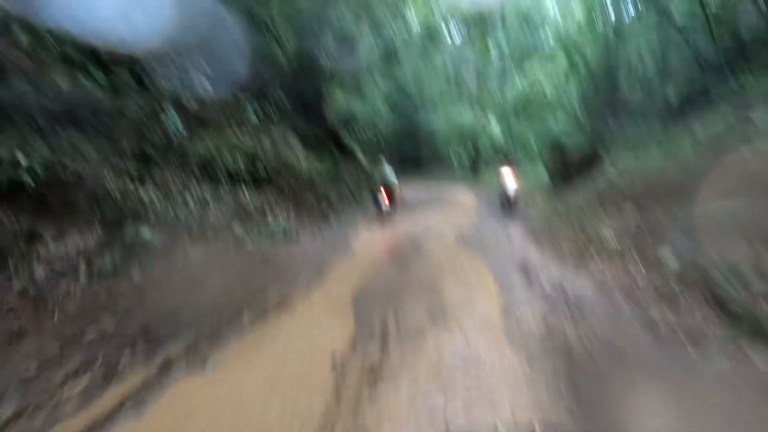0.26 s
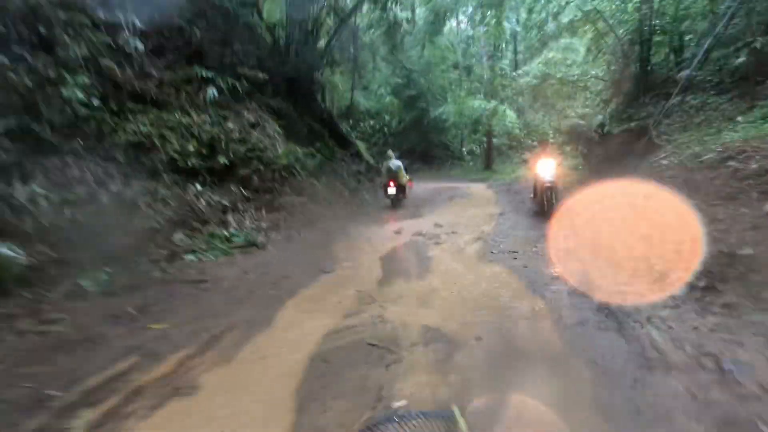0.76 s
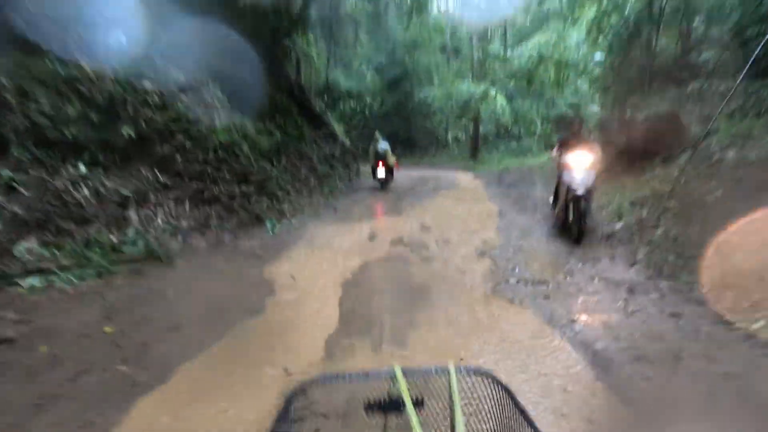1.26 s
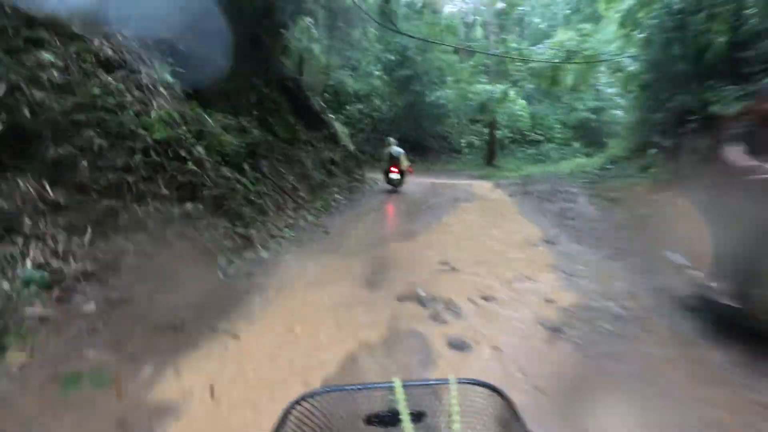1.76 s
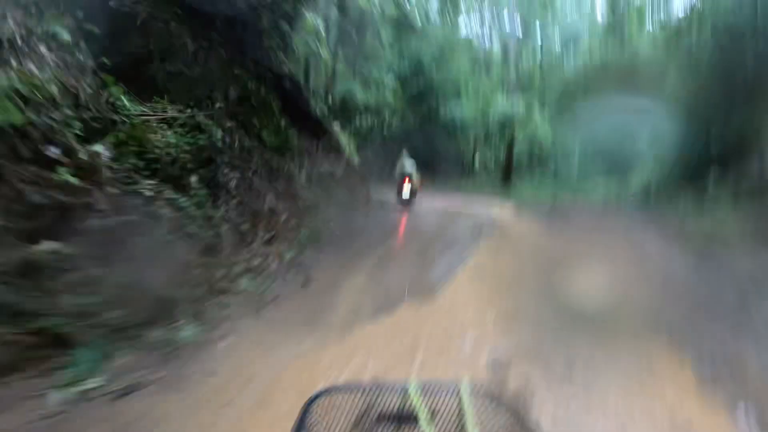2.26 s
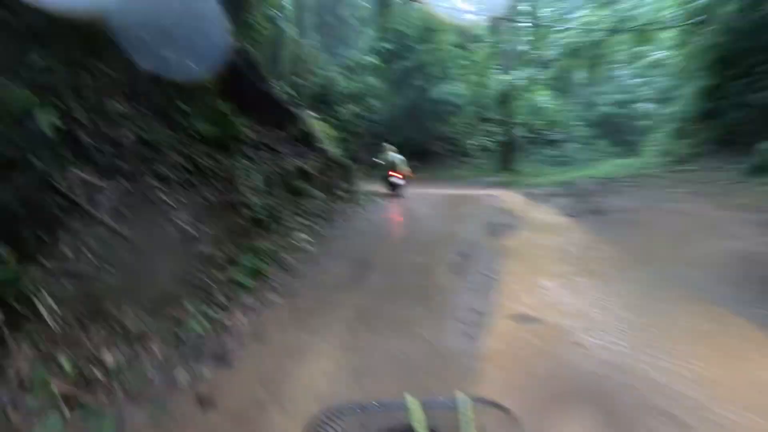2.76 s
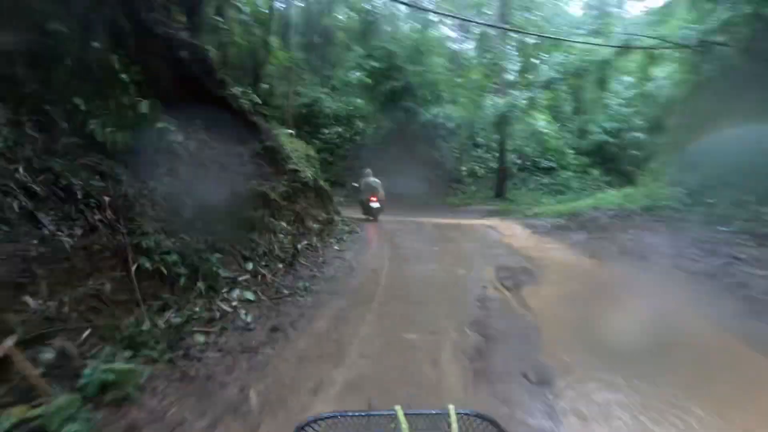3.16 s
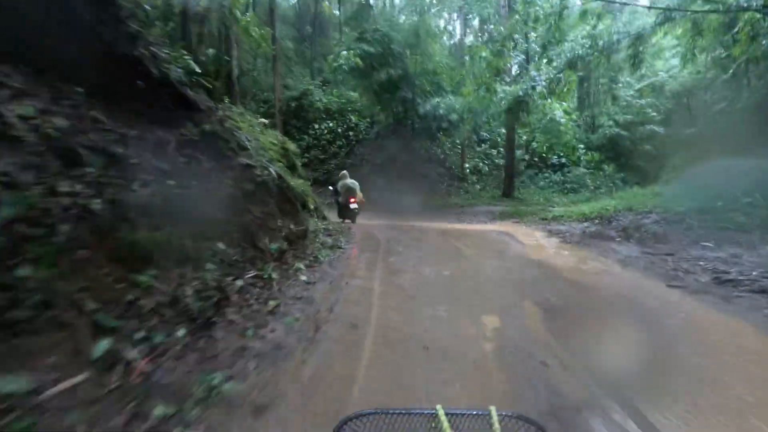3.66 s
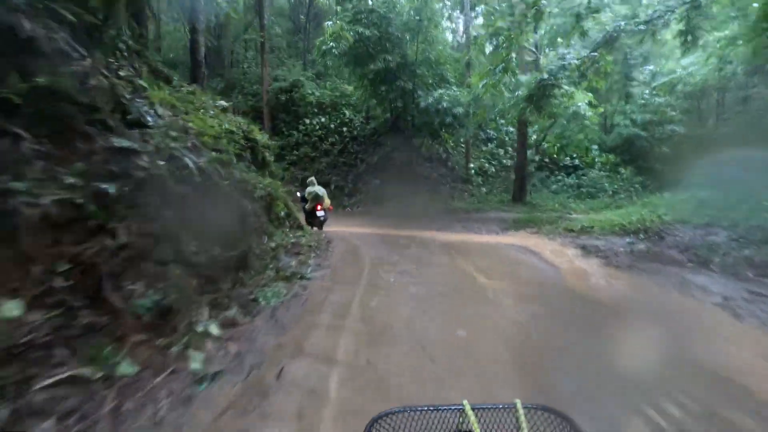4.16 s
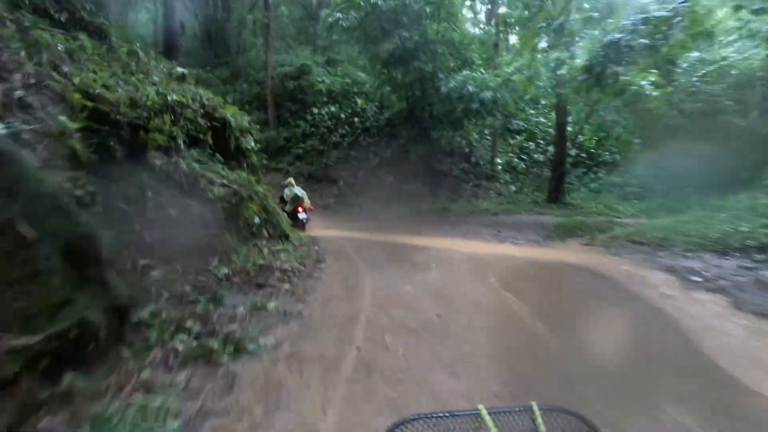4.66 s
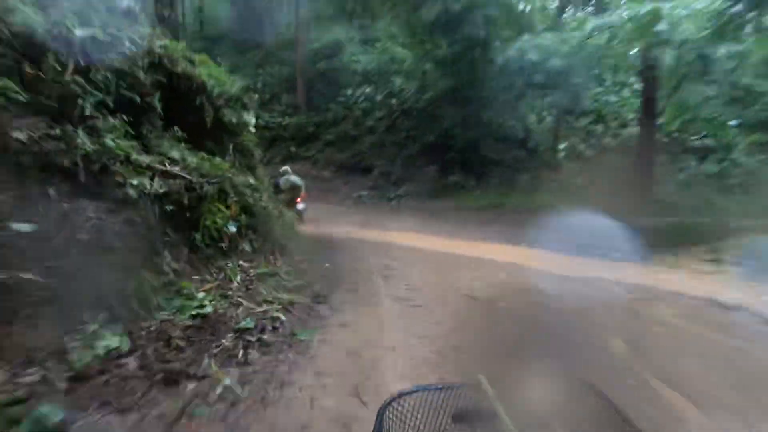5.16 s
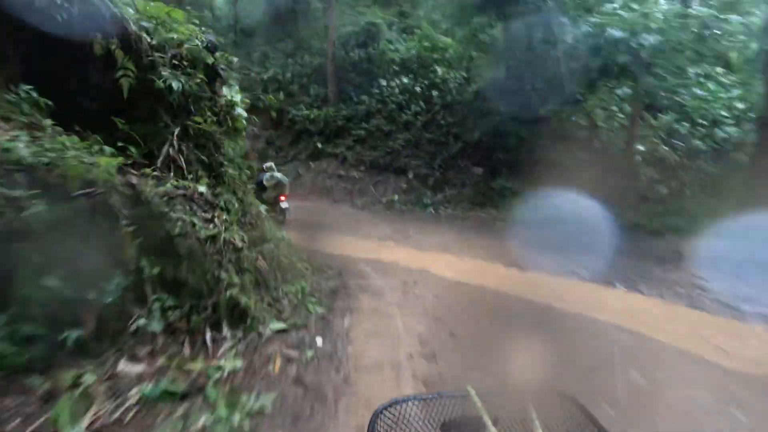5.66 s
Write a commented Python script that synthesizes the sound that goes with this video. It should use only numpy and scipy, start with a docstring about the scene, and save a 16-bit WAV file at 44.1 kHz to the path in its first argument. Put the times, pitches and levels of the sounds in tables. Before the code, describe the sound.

A small single-cylinder motorbike chugs at a nearly steady speed for about six seconds, heard from the rider. Low wind buffets the microphone throughout, over a dull churn of wheels in mud. A short wet swish comes at about 0.3 seconds. Loose parts and the basket knock several times between 0.9 and 1.9 seconds. An oncoming motorbike rushes past at about 1.6 seconds, its note dropping, then revs away with deep pops, loudest around 2.4 seconds. Water swishes over the microphone near 2.7 seconds, and the muffled sound gradually opens into a soft rain hiss. From 3 seconds, bumps bring small ringing rattles, and raindrops tap the microphone, growing sharper and louder from about 4 seconds. At 5.5 seconds one big drop slaps loudly on the right, briefly dipping everything else. A few more taps follow as the hiss dulls and the engine carries on.

```python
"""A small single-cylinder motorbike chugs along a muddy track in heavy rain, heard from a camera on the rider.
Gas pulses excite the exhaust's resonances, bumps ring loose parts and turbulence buffets the microphone.
An oncoming bike passes, popping. Drops tap the housing, and water on its port (the window) muffles the
rain until it drains and the hiss opens up. Near the end one big drop makes the limiter duck."""
import sys
import numpy as np
from scipy import signal
from scipy.fft import rfft, irfft, next_fast_len
from scipy.io import wavfile
from scipy.ndimage import uniform_filter1d, minimum_filter1d, map_coordinates

SR = 44100
rng = np.random.default_rng(int(sys.argv[2]) if len(sys.argv) > 2 else 0)


def output_pcm(signal):
    """Save a mono or channel-first signal as 16-bit PCM at the path in sys.argv[1].

    Samples are clipped to [-1, 1] before scaling.
    """
    pcm = np.clip(np.atleast_2d(signal).T, -1, 1) * 32767
    wavfile.write(sys.argv[1], SR, np.round(pcm).astype(np.int16))


N = 261041
T = np.arange(N) / SR


def amp(db):
    """Decibels to amplitude ratio."""
    return 10 ** (np.asarray(db) / 20)


def unit(x):
    """Normalisation to rms 1."""
    return x / np.sqrt(np.mean(x ** 2) + 1e-20)


def along(points, hz):
    """Interpolation of (Hz, value) points on a log-frequency axis."""
    f, v = np.transpose(points)
    return np.interp(np.log(hz + 1), np.log(f + 1), v)


def curve(rows):
    """Linear interpolation of (seconds, value) rows at every sample."""
    return np.interp(T, *np.transpose(rows))


def swell(start_s, end_s, rise, fall, t=T):
    """Envelope: 0 from start to end, sloping down on either side at the given rates per second."""
    return -rise * np.maximum(start_s - t, 0) - fall * np.maximum(t - end_s, 0)


def wobble(rate):
    """Smooth random modulation, rate knots a second."""
    return map_coordinates(rng.standard_normal(int(N * rate / SR) + 4), [T * rate])


def filtered(x, response):
    """Linear filtering: the spectrum of x times a frequency response."""
    n = x.shape[-1]
    m = next_fast_len(n + SR // 4)
    return irfft(rfft(x, m) * response(np.fft.rfftfreq(m, 1 / SR)), m)[..., :n]


def noise(spectrum):
    """Coloured noise of rms 1."""
    return unit(filtered(rng.standard_normal(N), lambda hz: amp(along(spectrum, hz))))


def band_noise(centre_hz, octaves, n=N):
    """Noise of rms 1 in a Gaussian band of log frequency."""
    bell = lambda hz: np.exp(-.5 * (np.log2((hz + 1) / centre_hz) / octaves) ** 2)
    return unit(filtered(rng.standard_normal(n), bell))


def resonate(x, modes, low_hz, high_hz):
    """Modal superposition: x drives damped resonators of alternating sign, then a band-pass."""
    def response(f):
        return sum((-1) ** k * amp(db) * 1j * f * width / (hz * hz - f * f + 1j * f * width)
                   for k, (hz, width, db) in enumerate(modes))
    skirts = signal.butter(3, [low_hz, high_hz], 'band', fs=SR, output='sos')
    return signal.sosfilt(skirts, filtered(x, response))


def pan(db):
    """Stereo gains for a level difference, positive to the left."""
    return amp(np.array([[db / 2], [-db / 2]]))


def cycles(rpm, firing_s):
    """Four-stroke phase: one cycle per two crank turns, a whole number at each firing."""
    cycle = np.cumsum(rpm) / (120 * SR)
    return cycle - np.interp(firing_s, T, cycle) % 1


def firings(cycle, scatter_db, jitter_s):
    """A quasi-periodic impulse train: one pulse a cycle, varying in size and timing."""
    times = np.interp(np.arange(np.floor(cycle[-1]) + 1), cycle, T)
    size, late = rng.standard_normal((len(times), 2)).T
    at = np.clip((times + jitter_s * late) * SR, 0, N - 1).astype(int)
    return np.bincount(at, amp(scatter_db * size), N)


# Crank vibration reaching the camera. Each row: time in seconds, level in dB.
SHAKE_LEVEL = [(0, -22), (.9, -24), (1.85, -19), (2.3, -26), (2.6, -22.5), (3.15, -21), (3.45, -24.5),
               (4.15, -20.5), (4.8, -25.5), (5.15, -20), (5.92, -25.5)]

def crank_shake(cycle):
    """Forced vibration once per crank turn, with a weak subharmonic at the firing rate."""
    phase = 2 * np.pi * cycle
    return amp(curve(SHAKE_LEVEL) + 1.2 * wobble(10)) * (np.cos(2 * phase) + amp(-18) * np.sin(phase))


# Throttle. Each row: time in seconds, exhaust level in dB.
EXHAUST_LEVEL = [(0, -25.5), (.7, -21.5), (1.45, -26), (2.45, -22.5), (3.45, -25), (4.85, -24),
                 (5.3, -30.5), (5.8, -24)]
# Silencer and body resonances. Each row: frequency in Hz, bandwidth in Hz, relative gain in dB.
PIPE_MODES = [(85.5, 20.2, 1.5), (106.6, 26.7, 1.5), (129.6, 13.5, 0.5), (302.6, 38.5, -13),
              (548, 61, -30.5), (971, 23, -31.5)]

def exhaust(cycle):
    """Source and filter: exhaust blows, intake gulps and steady gas flow excite the silencer's modes."""
    blows = firings(cycle, scatter_db=0.5, jitter_s=0.00021)
    gulps = 0.29 * firings(cycle - .4, scatter_db=0.5, jitter_s=0.00028)
    gas = unit(blows + gulps) + amp(-11.5) * rng.standard_normal(N)
    return amp(curve(EXHAUST_LEVEL)) * unit(resonate(gas, PIPE_MODES, low_hz=69.4, high_hz=1110))


# Panel hum. Each row: multiple of the firing rate, level in dB.
HUM_HARMONICS = [(11, -51), (14, -41), (15, -43.5), (16, -46.5), (17, -46.5)]
# Panel and basket resonances. Each row: frequency in Hz, bandwidth in Hz, relative gain in dB.
PANEL_MODES = [(319.4, 45, 4), (535, 127, -8), (664, 109, -7.5), (978.4, 26, -11.5)]

def panels(cycle):
    """Driven panels hum at engine harmonics; chatter, hardest after each crank turn, excites their modes."""
    phase = 2 * np.pi * cycle
    hum = sum(amp(db + 3.3 * wobble(3)) * np.sin(k * phase + wobble(2.046)) for k, db in HUM_HARMONICS)
    jolts = 3.8 + np.exp(-(2 * cycle % 1) / 0.18)
    chatter = rng.standard_normal(N) * jolts * amp(1.3 * wobble(14))
    stony_stretch_db = 3 * amp(swell(1.7, 2.33, rise=20, fall=20))
    rattle_db = -36 + 0.65 * T + stony_stretch_db
    return hum + amp(rattle_db) * unit(resonate(chatter, PANEL_MODES, low_hz=211, high_hz=1066))


# Crank speed. Each row: time in seconds, speed in rpm.
ENGINE_RPM = [(0.0, 2512), (0.5, 2545), (1.5, 2560), (2.2, 2658), (2.65, 2583), (3.5, 2586), (4.15, 2724),
              (4.7, 2482), (5.92, 2540)]

def engine():
    """Phase locking: one four-stroke cycle times the crank, the exhaust and the panels."""
    cycle = cycles(curve(ENGINE_RPM), firing_s=.0214)
    return crank_shake(cycle) + exhaust(cycle) + panels(cycle)


# Head wind. Each row: time in seconds, level in dB.
WIND_LEVEL = [(0, -26), (.8, -25.5), (1.4, -27.5), (1.8, -27.5), (2.3, -26.5), (3.9, -28), (4.7, -28.5),
              (5.4, -26), (5.92, -32)]
# Buffeting. Each row: frequency in Hz, relative spectral density in dB.
WIND_SPECTRUM = [(12, -3), (25, -2.5), (60, 1.5), (130, 0), (200, -8.5), (300, -16), (600, -37),
                 (1500, -69.5), (3000, -120)]

def wind():
    """Turbulent pressure on the microphone; head wind and the passing bike's draught add in power."""
    lumps = amp(0.66 * wobble(16) + wobble(2.9))
    draught = amp(-19.5 + swell(PASS_S, PASS_S, rise=108.5, fall=108.5))
    return np.hypot(amp(curve(WIND_LEVEL)), draught) * unit(noise(WIND_SPECTRUM) * lumps)


# Churning of mud, deep at first and then shallower. Each row: time in seconds, level in dB.
MUD_LEVEL = [(0, -30.5), (1.3, -35.5), (1.65, -32.5), (2.4, -33.5), (3.15, -36), (3.55, -41.5), (5.4, -37)]
# Wet mud. Each row: frequency in Hz, relative spectral density in dB.
MUD_SPECTRUM = [(100, -15), (220, -0.5), (450, 1), (750, -3.5), (1050, -11.5), (1300, -19), (1700, -25),
                (2300, -26), (3100, -38), (4200, -50), (5000, -46), (6500, -63.5), (8000, -64.5),
                (10000, -75)]

def tyres():
    """Amplitude-modulated noise: the dull, uneven rush of wheels in mud."""
    return amp(curve(MUD_LEVEL)) * unit(noise(MUD_SPECTRUM) * amp(1.5 * wobble(35)))


# The loudest drops. Each row: start in seconds, ping level in dB, ping frequency in Hz,
# ping T60 in seconds, splash level in dB, knock level in dB.
DROP_IMPACTS = [(.065, -32, 2290, 0.0058, -52.5, -30), (.299, -29.5, 4700, 0.0042, -44.5, -39),
                (.571, -31, 13350, .003, -53.5, -47), (2.2622, -24, 2860, .009, -41.5, -23),
                (2.941, -31, 13200, .006, -35.5, -24), (3.0019, -30, 1700, .003, -22.5, -29),
                (3.899, -26.5, 6500, 0.011, -27.5, -38), (3.947, -24, 3000, 0.01, -24.5, -35),
                (4.011, -27.5, 5200, .006, -28.5, -38), (4.1637, -18, 2660, 0.0033, -20.5, -20),
                (4.185, -23, 6900, .006, -29, -39), (4.4228, -21, 10500, 0.0018, -23, -34),
                (4.949, -11.5, 6600, 0.0065, -19.5, -23), (5.1833, -11, 1900, .005, -13, -10),
                (5.3405, -13, 5000, 0.0056, -19, -15), (5.3745, -23, 5200, 0.0073, -24, -34),
                (5.629, -33, 3130, 0.018, -26, -26.5), (5.6606, -11, 1260, .0035, -22.5, -13),
                (5.7216, -22, 1400, 0.0052, -27.5, -29), (5.7725, -13, 2120, 0.013, -22, -29),
                (5.783, -25, 3800, 0.015, -23, -33)]
# A drop's splash. Each row: frequency in Hz, relative spectral density in dB.
SPLASH_SPECTRUM = [(200, -5), (1200, 3.5), (3500, 3), (7000, -4.5), (9500, -16.5), (11500, -27.5),
                   (15000, -32)]

def drops():
    """Impact excitation: each drop gives a ping, a splash and a knock of the housing; the port dulls them."""
    out, t = np.zeros(N + SR), T[:SR // 20]
    rows = [*DROP_IMPACTS, *patter()]
    white = rng.standard_normal((len(rows), len(t)))
    fizzes = unit(filtered(white, lambda hz: amp(along(SPLASH_SPECTRUM, hz))))
    onset = 1 - np.exp(-t / 0.00027)
    ring = lambda hz, t60: onset * np.sin(2 * np.pi * hz * t) * amp(-60 * t / t60)
    for (s, ping_db, hz, t60, splash_db, knock_db), fizz in zip(rows, fizzes):
        splash = amp(splash_db - 60 * t / .0055) * onset * fizz
        knock = amp(knock_db) * ring(hz=540, t60=0.0067)
        out[round(s * SR):][:len(t)] += amp(ping_db) * ring(hz, t60) + splash - knock
    return filtered(out[:N], lambda hz: amp(along([(7000, 1.5), (11000, -4)], hz)))


# Water sliding over the port. Each row: peak time in seconds, half-length in seconds, level in dB,
# centre frequency in Hz, spread in octaves.
RIVULETS = [(0.119, 0.13, -52, 1367, 0.25), (0.228, .042, -44.5, 2450, 0.22),
            (0.307, 0.024, -56.5, 6020, 0.082), (.315, 0.024, -50.5, 4280, .09),
            (.58, .012, -64, 3900, .25), (2.275, 0.021, -45, 2410, 0.094), (2.264, .004, -37, 1650, 0.52),
            (2.714, 0.029, -40.5, 1390, 0.45), (2.72, 0.15, -61.5, 5500, 0.49),
            (2.722, 0.044, -35.5, 980, 0.083), (2.72, 0.036, -37, 700, .25),
            (5.481, 0.019, -33.5, 1580, 0.69), (5.804, 0.016, -37, 950, 0.15)]

def slosh():
    """Flow noise: running water fizzes in a narrow band under a Gaussian envelope."""
    out, t = np.zeros(N + SR), T[:SR // 2] - 1 / 4
    for s, half_length, db, hz, octaves in RIVULETS:
        fizz = band_noise(hz, octaves, len(t))
        out[round(s * SR):][:len(t)] += amp(db) * fizz * np.exp(-(t / half_length) ** 2)
    return out[len(t) // 2:][:N]


def water_film():
    """A swept low-pass: the edge of a wet swish rises, then falls as water closes over the port."""
    hz, t, spectra = signal.stft(rng.standard_normal(N) * amp(2.6 * wobble(300)), SR, nperseg=256)
    octaves = swell(0.301, 0.328, rise=13, fall=18, t=t)
    edge_hz = 3800 * 2 ** np.maximum(octaves, -2)
    low_pass = 1 / (1 + (hz[:, None] / edge_hz) ** 14)
    level = amp(-28 + swell(0.301, 0.42, rise=89, fall=235.5, t=t))
    return signal.istft(spectra * low_pass * level, SR, nperseg=256)[1][:N]


# Spells of thin sizzle. Each row: start in seconds, end in seconds.
SIZZLE_SPELLS = [(.4, 1.62), (2.56, 5.48)]
# The sizzle's colour. Each row: frequency in Hz, relative spectral density in dB.
SIZZLE_SPECTRUM = [(9000, -70), (11300, -20.5), (11900, 3.5), (12400, 4), (13000, -2.5), (14000, 1.5),
                   (15800, -5.5)]

def sizzle():
    """Uncorrelated noise in each channel: a diffuse flicker of high treble, stronger on the left."""
    spells = sum(amp(swell(start, end, rise=36, fall=158.5)) for start, end in SIZZLE_SPELLS)
    level = spells * amp(-65 + 1.2 * wobble(60))
    return pan(9) * level * np.array([noise(SIZZLE_SPECTRUM), noise(SIZZLE_SPECTRUM)])


# Jolts to the basket and loose parts. Each row: start in seconds, level in dB, frequency in Hz,
# T60 in seconds.
JOLTS = [(.875, -18, 720, 0.022), (1.451, -18, 665, 0.015), (1.628, -18.5, 652, 0.028),
         (1.891, -20, 600, 0.032), (2.94, -20.5, 656, 0.021), (3.1, -28, 763, 0.14),
         (3.285, -33, 770, 0.081), (3.36, -31.5, 760, 0.13), (3.655, -31, 740, 0.064),
         (3.735, -29, 774, 0.086), (3.92, -36.5, 960, 0.12), (4.16, -29.5, 974, 0.093),
         (4.295, -27.5, 770, 0.081), (4.365, -32, 1000, 0.054), (4.458, -37, 1000, 0.07),
         (4.825, -27.5, 743, 0.087), (4.947, -24.5, 1057, 0.032), (5.26, -29.5, 1026, .09)]

def bumps():
    """Damped free vibration: each jolt rings a loose part at a slightly unsteady pitch."""
    out, t = np.zeros(N), T[:SR // 8]
    onset = 1 - np.exp(-t / 0.0014)
    for s, db, hz, t60 in JOLTS:
        phase = 2 * np.pi * hz * t + 0.35 * wobble(210)[:len(t)]
        out[round(s * SR):][:len(t)] += amp(db - 60 * t / t60) * onset * np.sin(phase)
    return out


PASS_S = 1.58  # the two bikes draw level
# The other bike's note drops as it passes, then it revs away. Each row: time in seconds, apparent rpm.
ONCOMING_RPM = [(1.58, 2550), (2.05, 2190), (2.32, 2180), (2.42, 2400), (2.49, 2565)]

def oncoming_bike():
    """Convolution: a bike rushes by, each firing a steep pop and a boom as its pipe sucks back."""
    t = T[:SR // 12]
    ring = lambda hz, db, t60: np.sin(2 * np.pi * hz * t) * amp(db - 60 * t / t60)
    boom = ring(hz=100, db=-10, t60=0.13) * (1 - np.exp(-t / 0.005))
    bark = ring(hz=505, db=-7, t60=0.014)
    pop = ring(hz=360, db=0, t60=.012) + bark - boom
    cycle = cycles(curve(ONCOMING_RPM), firing_s=2.3933)
    pops = signal.fftconvolve(firings(cycle, scatter_db=-1.5, jitter_s=0.0001), pop)[:N]
    pops = signal.sosfilt(signal.butter(4, 640, fs=SR, output='sos'), pops)
    pops_db = -1.5 + swell(2.566, 2.35, rise=27, fall=44)  # loudest as its pipe points at the camera
    rush_db = -29.5 + swell(PASS_S, PASS_S, rise=96.5, fall=25.5)
    return amp(pops_db) * pops + amp(rush_db) * band_noise(220, 0.71)


def hiss_db():
    """Transmission loss sets the rain's level: a plug of water slides off, the rest drains, a drop rewets."""
    clear_s, drain_s = 2.582, 0.6
    plugged_db = 201.5 * np.maximum(clear_s - T, 0)
    damp_db = 29 / (1 + np.maximum(T - clear_s, 0) / drain_s)
    rewetted_db = 7.5 * np.clip((T - BIG_DROP_S) / 0.27, 0, 1)
    return -28.5 - plugged_db - damp_db - rewetted_db


# Rain hiss. Each row: frequency in Hz, relative spectral density in dB.
RAIN_SPECTRUM = [(300, 9), (800, -1), (1600, 1), (2500, -3), (4500, -5.5), (6200, -8.5), (6900, -6),
                 (7250, -13.5), (8800, -15.5), (10200, -25.5), (11300, -34), (15800, -51)]
# Likeness of the hiss in the two channels. Each row: frequency in Hz, coherence from 0 to 1.
RAIN_COHERENCE = [(1000, 0.62), (2500, 0.59), (4500, 0.88), (7000, 1), (10000, 0.23)]

def rain():
    """Incoherent summation: countless far drops merge to a hiss; nearer ones stand out as grains."""
    arrivals = rng.random(N) < 300 / SR
    grains = arrivals * rng.standard_normal(N) * amp(2 * rng.standard_normal(N))
    mid_side = rng.standard_normal((2, N))
    mid_side[0] += amp(-8.5) * unit(grains)
    def response(hz):
        angle = np.arccos(np.clip(along(RAIN_COHERENCE, hz), -1, 1)) / 2
        return amp(along(RAIN_SPECTRUM, hz)) * [np.cos(angle), np.sin(angle)]
    mid, side = filtered(mid_side, response)
    return amp(hiss_db() + 0.81 * wobble(20)) * unit(np.array([mid + side, mid - side]))


def patter(per_s=4.7, over_hiss_db=7.5, centre_hz=4220, t60=0.0081):
    """Random arrivals: rows like DROP_IMPACTS for light drops, heard as far as the port is clear."""
    count = int(per_s * N / SR)
    when, strength, pitch = rng.random((count, 3)).T
    times = (np.arange(count) + when) / per_s
    levels = np.interp(times, T, hiss_db()) + over_hiss_db + 6 * (strength - .5)
    return [(s, db, hz, t60, db, db) for s, db, hz in zip(times, levels, centre_hz * 2 ** (pitch - .5))]


# A hollow in the midrange. Each row: time in seconds, centre frequency in Hz, depth in dB.
NOTCH_PATH = [(2.9, 1060, -1), (3.25, 980, 9), (3.6, 870, 7), (4.1, 790, 13), (4.6, 840, 4.5),
              (5.45, 846, 3), (5.6, 840, 7)]

def hollow(x, width_hz=50):
    """A moving notch filter: a narrow, wandering band of the sound sinks away."""
    hz, t, spectra = signal.stft(x, SR, nperseg=2048)
    s, centre_hz, depth_db = np.transpose(NOTCH_PATH)
    bell = np.exp(-.5 * ((hz[:, None] - np.interp(t, s, centre_hz)) / width_hz) ** 2)
    notch = amp(-np.interp(t, s, depth_db) * bell)
    return signal.istft(spectra * notch, SR, nperseg=2048)[1][..., :N]


BIG_DROP_S = 5.4828

def big_drop():
    """An impact transient on the right of the port: a slap, a crack, the water's push, then dying spray."""
    t = np.maximum(T - BIG_DROP_S, 0)
    onset = lambda rise_s: 1 - np.exp(-(t / rise_s) ** 2)
    decay = lambda db, t60: amp(db - 60 * t / t60)
    thud = -np.sin(2 * np.pi * 280 * t) + 0.5 * band_noise(390, 0.9)
    slap = decay(db=16.7, t60=0.022) * onset(0.0023) * thud
    crack = decay(db=1.5, t60=.014) * onset(0.0011) * band_noise(1000, 0.6)
    push = amp(-0.5) * np.exp(-((T - BIG_DROP_S - 0.0075) / 0.0023) ** 2)
    spray = decay(db=-22.5, t60=0.28) * onset(0.0011) * noise(RAIN_SPECTRUM)
    return pan(-14.5) * (slap + crack + push) + spray


def scene():
    """Superposition: bikes and small drops in the middle, rain around them, the big drop to the right."""
    ride = hollow(engine() + tyres() + rain() + sizzle())
    return ride + bumps() + oncoming_bike() + wind() + drops() + slosh() + water_film() + big_drop()


# Hollows and peaks of the camera housing. Each row: frequency in Hz, gain in dB.
HOUSING_RESPONSE = [(260, 1.5), (325, -0.5), (400, -3.5), (470, 0), (740, -1), (860, -2.5), (960, 1.5),
                    (1100, 0)]

def housing(x):
    """A minimum-phase filter: the housing rings only after a blow, never before it."""
    m = next_fast_len(N + SR // 4)
    gain = amp(along(HOUSING_RESPONSE, np.fft.rfftfreq(m, 1 / SR)))
    cepstrum = irfft(np.log(gain), m)
    cepstrum[1:] *= 2  # folded onto positive time
    return irfft(rfft(x, m) * np.exp(rfft(cepstrum[:m // 2], m)), m)[..., :N]


def limiter(x, ceiling_db, release_db_per_s):
    """Peak limiting: the gain falls at once on a peak and recovers gradually."""
    over_db = np.maximum(20 * np.log10(np.abs(x).max(axis=0) + 1e-9) - ceiling_db, 0)
    ahead_db = -minimum_filter1d(-over_db, size=89)
    cut_db = np.maximum.accumulate(ahead_db + release_db_per_s * T) - release_db_per_s * T
    return x * amp(-uniform_filter1d(cut_db, size=89))


def record(dry):
    """The camera's signal chain: housing colour, peak limiting and a band limit."""
    limited = limiter(housing(dry), ceiling_db=-2.0, release_db_per_s=109.0)
    return filtered(limited, lambda hz: hz < 15850)


dry = scene()
out = record(dry)
output_pcm(out)
```